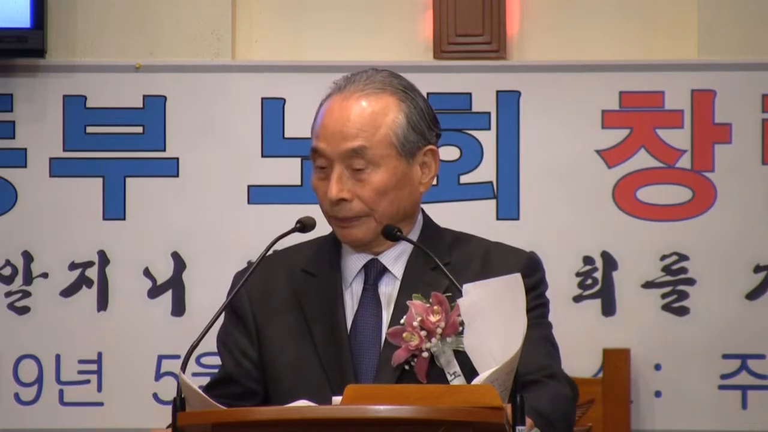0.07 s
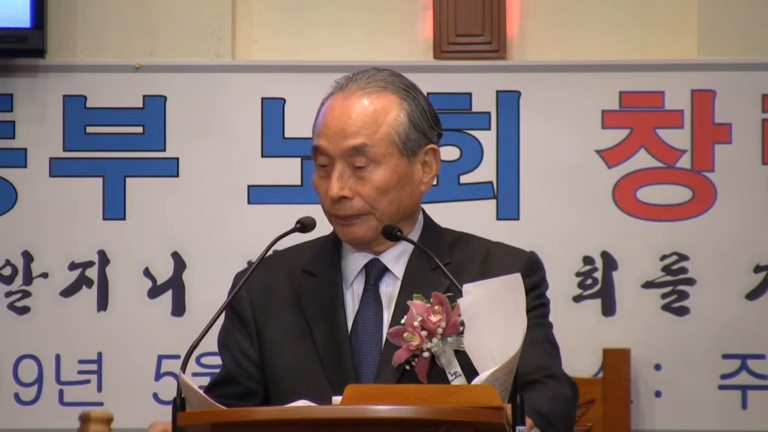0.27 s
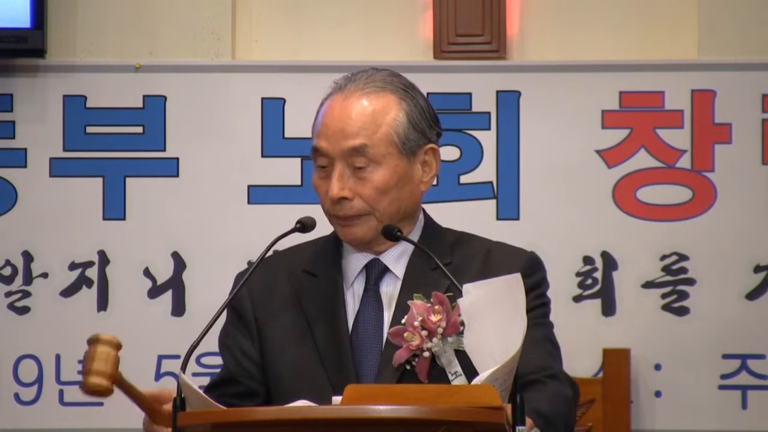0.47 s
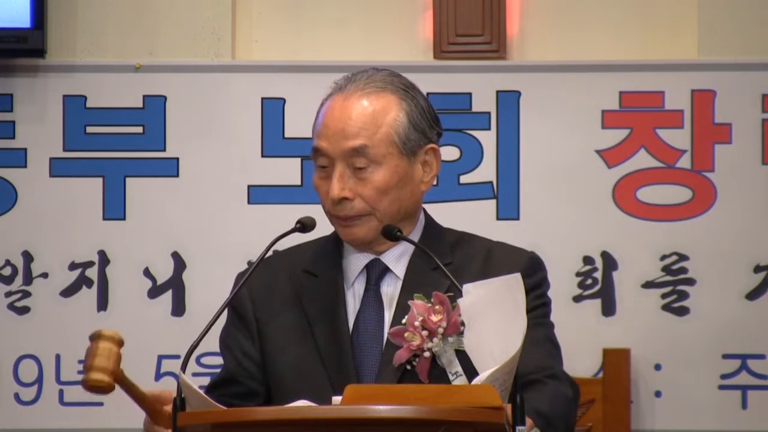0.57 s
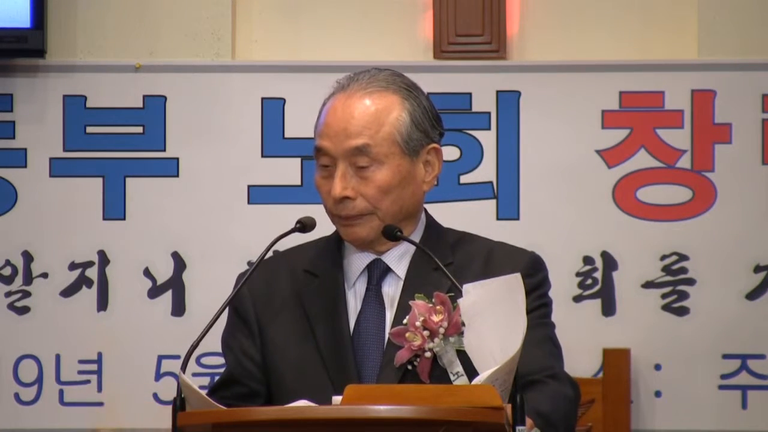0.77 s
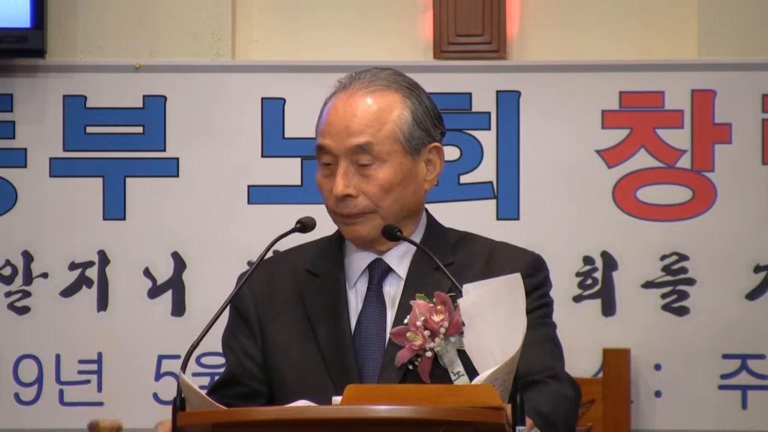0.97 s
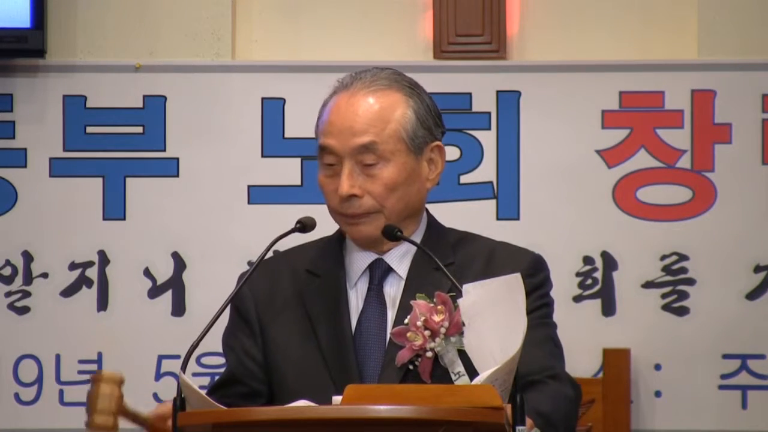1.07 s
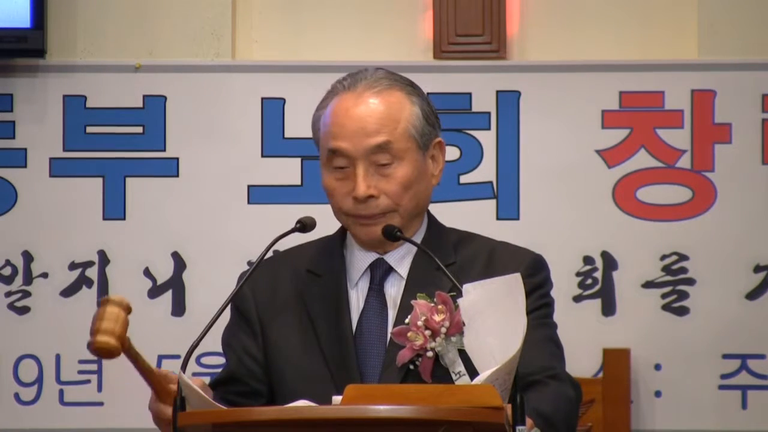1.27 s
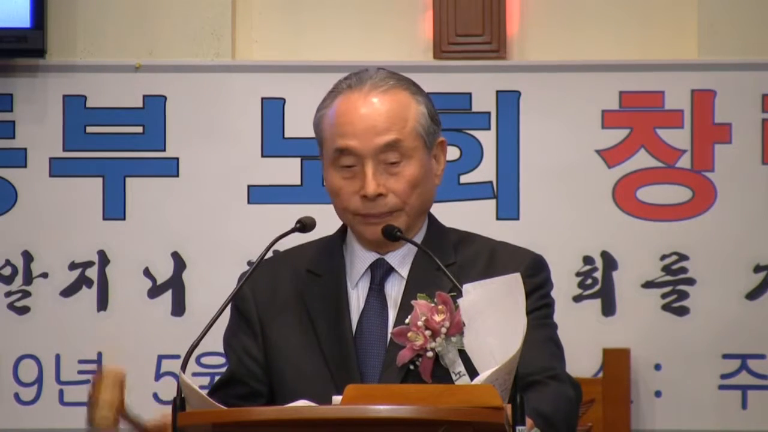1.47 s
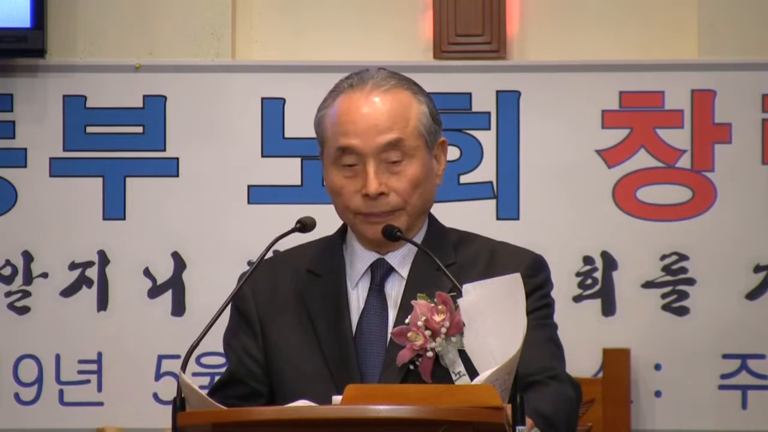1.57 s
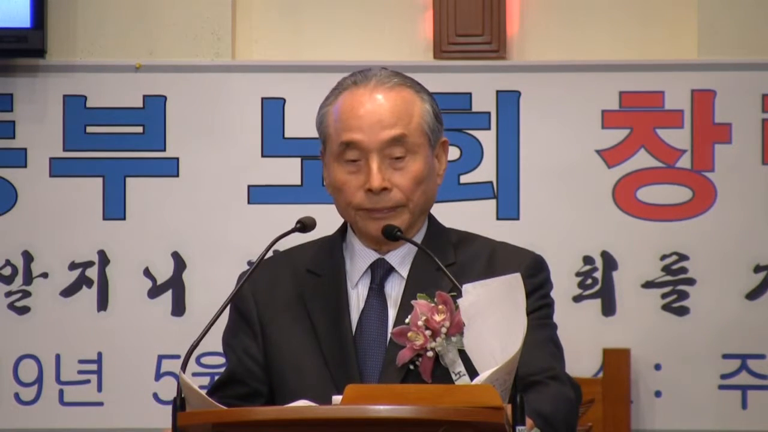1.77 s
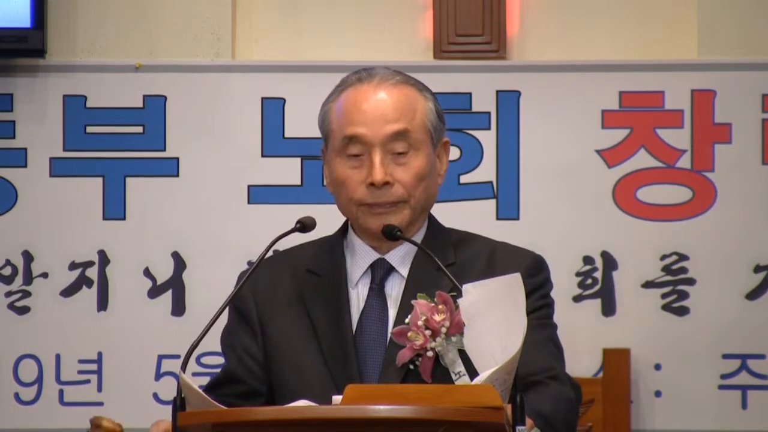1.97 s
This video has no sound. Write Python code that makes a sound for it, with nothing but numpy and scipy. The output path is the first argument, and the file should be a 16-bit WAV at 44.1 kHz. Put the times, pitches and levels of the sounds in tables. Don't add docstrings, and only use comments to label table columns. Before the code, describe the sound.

A wooden gavel hits its block on a hollow lectern at about 0.1, 0.9 and 1.6 seconds. Each blow is a sharp, bright wooden crack with a short knock and dull thump; the second is softer and woodier. Hall reverberation follows, the level ducking at each hit then swelling back. Steady low ventilation rumble lies underneath, with very faint seat rustles and bumps between blows.

```python
import sys
import numpy as np
from scipy import signal
from scipy.io import wavfile

SR = 44100
rng = np.random.default_rng(int(sys.argv[2]) if len(sys.argv) > 2 else 0)


def to_wav(s):
    ch = np.atleast_2d(s).T
    pcm = np.round(np.clip(ch, -1, 1) * 32767)
    wavfile.write(sys.argv[1], SR, pcm.astype(np.int16))


def how_loud(loudness_db):
    steps = np.asarray(loudness_db, float) / 20
    return 10 ** steps


N = 89655


def at_hz(points, hz):
    table = np.array(points, float)
    return [np.interp(np.log(hz), np.log(table[:, 0]), column) for column in table[:, 1:].T]


def band(x, low_hz, high_hz):
    sos = signal.butter(2, [low_hz, min(high_hz, 0.45 * SR)], "band", fs=SR, output="sos")
    return signal.sosfilt(sos, x)


def fold(x, response):
    return signal.fftconvolve(x, response, axes=-1)[..., :N]


def dying(t, t60_s):
    return (t >= 0) * how_loud(-60 * np.maximum(t, 0) / t60_s)


# frequency in Hz, likeness from 0 to 1.
LIKENESS = [(60, 0.9), (300, .96), (1500, 0.91), (4000, 0.79), (8000, 0.34), (14000, 0.1)]
# frequency in Hz, left over right in dB.
LEAN = [(60, -0.5), (240, -2.5), (950, -0.5), (3770, -1.0), (15000, -1)]


def stereo_bands(shape, size):
    settle = 4000
    edges_hz = 24 * 2 ** np.arange(0, 9.6, 1 / 3)
    white = rng.standard_normal((2, 2, size + settle))
    out = 0
    for k, (low_hz, high_hz) in enumerate(zip(edges_hz, edges_hz[1:])):
        mid, side = band(white[k % 2], low_hz, high_hz)[:, settle:]
        hz = np.sqrt(low_hz * high_hz)
        alike = np.clip(at_hz(LIKENESS, hz)[0], 0, 1)
        lean_db = at_hz(LEAN, hz)[0] / 2
        pair = np.sqrt(1 + alike) * mid + np.sqrt(1 - alike) * side * [[1], [-1]]
        out = out + shape(hz) * pair * how_loud(np.array([[lean_db], [-lean_db]]))
    return out


# frequency in Hz, density in dB per Hz.
AIR = [(15, -40), (25, -3), (190, 6.5), (384, -4.5), (476, -6.5), (641, -9.5), (1700, -18.5), (3080, -23),
       (16000, -35.5)]
# centre in Hz, width in Hz, level in dB.
DUCT = [(126.2, 4.7, -43), (168, 21, -43.5), (176, 6.7, -46)]


def air():
    air_db, patchy_db, knots = -39, 0.5, 24

    def shape(hz):
        drift = np.interp(np.linspace(0, knots - 1, N), np.arange(knots), rng.standard_normal(knots))
        return how_loud(at_hz(AIR, hz)[0] + patchy_db * drift)

    out = stereo_bands(shape, size=N)
    out = how_loud(air_db) * out / out.std()
    for hz, width_hz, db in DUCT:
        tone = band(rng.standard_normal(2 * N), hz - width_hz / 2, hz + width_hz / 2)[N:]
        out = out + how_loud(db) * tone / tone.std() * how_loud(np.array([[-1.1], [1.1]]))
    return out


# start in seconds, level in dB, low Hz, high Hz, t60 in seconds.
SHUFFLES = [
    (.59, -43, 290, 370, .25),
    (.705, -41, 300, 430, .18),
    (1.27, -49, 2600, 6500, .12),
    (1.36, -33, 90, 200, .4),
    (1.40, -60, 2000, 10000, .6),
    (1.504, -39, 350, 850, .12),
]


def shuffles():
    t, out = np.arange(N) / SR, 0
    for start_s, db, low_hz, high_hz, t60_s in SHUFFLES:
        noise = band(rng.standard_normal(N), low_hz, high_hz)
        onset = np.clip((t - start_s) / 0.005, 0, 1)
        out = out + how_loud(db) * noise / noise.std() * dying(t - start_s, t60_s) * onset
    return out


BLOW_S = [
    .1117,
    .8727,
    1.6331,
]
# length in seconds, level in dB, top in Hz.
LEAD_HISS = (.019, -35, 3300)


def lead_hiss():
    t, (length_s, db, top_hz) = np.arange(N) / SR, LEAD_HISS
    gate = sum(np.clip((t - s + length_s) / 0.0017, 0, 1) * (t < s) for s in BLOW_S)
    shared = rng.standard_normal(N)
    noise = band(0.9 * rng.standard_normal((2, N)) + shared, 330, top_hz)
    return how_loud(db) * gate * noise / noise.std()


# frequency in Hz, level in dB, t60 in seconds, build-up in seconds.
HALL = [(113, -26.5, 1.44, 0.1), (192, -17.5, 0.63, 0.04), (480, -20, 0.85, 0.018),
        (1440, -14.5, 0.64, 0.012), (3700, -25, 0.65, 0.0067), (6480, -29, 0.68, 0.005),
        (10770, -35, 0.41, 0.011), (16000, -60, 0.16, 0.01)]


def hall(x):
    t = np.arange(SR) / SR

    def shape(hz):
        db, t60_s, build_s = at_hz(HALL, hz)
        return how_loud(db) * (1 - np.exp(-(t / build_s) ** 2)) * dying(t, t60_s)

    return fold(x[None], stereo_bands(shape, size=len(t)))


# delay in seconds, level in dB, left over right in dB, left lag in seconds, top in Hz.
ECHOES = [
    (.0076, 1, 3, -.00002, 22000),
    (0.019, -8.5, 6, .00003, 8000),
    (0.021, -15, -15, -.00003, 1400),
    (.0022, -5, -1.5, .00002, 12000),
]


def early(x):
    out = np.array([x * how_loud(2.0), x * how_loud(7.5)])
    for delay_s, db, pan_db, lag_s, top_hz in ECHOES:
        dull = signal.lfilter(*signal.butter(1, top_hz, fs=SR), x)
        for side, sign in enumerate((0.5, -0.5)):
            delay = round((delay_s + sign * lag_s) * SR)
            out[side] += np.roll(dull, delay) * how_loud(5 + db + sign * pan_db)
    return out


# frequency in Hz, t60 in seconds,
# level in dB in blows 1, 2 and 3, extra dB toward the microphone.
WOOD = [(483.4, 0.026, -24, -13, -17, 0.5), (600, 0.026, -18.5, -6, -16, -3.5),
        (1299, 0.01, -24, -1, -13, 4), (1573, 0.022, -10.5, -3.5, -10, 2),
        (1758, 0.018, -12, -5.5, -12, -5), (2503, 0.025, -18, -12, -12, 9.5),
        (2724, 0.044, -42, -19, -19.5, 1.5), (3406, .03, -6, -14, -9, -2.5),
        (3760, 0.018, -13.5, -10, -12, -8.5), (4880, 0.021, -11.5, -15.5, -13.5, 1.5),
        (5860, .02, -14, -17, -15, -7), (6760, 0.031, -18.5, -16, -17.5, 1.5),
        (8250, 0.021, -14.5, -17.5, -27, 0), (9040, 0.015, -17, -20.5, -15, -1.5)]


def wood_modes(t, blow):
    swell_cycles = 2.3
    phases = rng.uniform(0, 2 * np.pi, len(WOOD))
    modes = []
    for row, phase in zip(WOOD, phases):
        hz, t60_s, db = row[0], row[1], row[2 + blow]
        envelope = dying(t, t60_s) * (1 - np.exp(-t * hz / swell_cycles))
        modes.append(how_loud(db) * envelope * np.sin(2 * np.pi * hz * t + phase))
    return modes


def crack(t):
    return band(rng.standard_normal(len(t)) * dying(t, 0.022), 1130, 7120)


def click(pulse):
    soft = 0.44
    return 10 * signal.lfilter([soft], [1, soft - 1], band(pulse, 260, SR / 2))


# low Hz, high Hz, level in dB.
LECTERN = [
    (118.7, 139.3, 5),
    (157, 231, 4.5),
    (294, 325, 0),
    (447, 655, -1.5),
]


def thump(pulse):
    return 20 * sum(how_loud(db) * band(pulse, low_hz, high_hz) for low_hz, high_hz, db in LECTERN)


# strength, crack, click, thump, hall send and recorder gain duck, all in dB.
BLOWS = [
    (2.9, -3, -2, -5, 0, 10.5),
    (-1.5, -2.5, -1, -1, -3.47, 8.5),
    (2.7, -1.5, 0, -5, 0.44, 13),
]


def gavel():
    swell_s = 0.00049
    near, far = np.zeros(N), np.zeros((2, N))
    t = np.arange(SR // 5) / SR
    pulse = 1.0 * (np.arange(len(t)) == 8)
    for k, (start_s, row) in enumerate(zip(BLOW_S, BLOWS)):
        db, crack_db, click_db, thump_db, send_db, _ = row
        modes = wood_modes(t, k)
        rings = sum(modes)
        facing = sum(how_loud(m[-1]) * ring for m, ring in zip(WOOD, modes))
        swell = how_loud(db) * (1 - np.exp(-t / swell_s))
        boom = how_loud(thump_db) * thump(pulse)
        start = int(start_s * SR)
        span = slice(start, start + len(t))
        near[span] += swell * (facing + how_loud(crack_db) * crack(t)) + 0.18 * boom
        far[:, span] += how_loud(send_db) * np.array([swell * rings, how_loud(click_db) * click(pulse) + boom])
    return near, far


def scene():
    drive_db = -0.68
    near, (head, lectern) = gavel()
    blows = early(near) + hall(head) + hall(lectern)
    return how_loud(drive_db) * blows + air() + shuffles() + lead_hiss()


def low_pass(x):
    return signal.sosfilt(signal.butter(12, 16250, fs=SR, output="sos"), x)


def record(dry):
    release_db_per_s, attack_s, clip, cutoff_hz = 76, 0.019, 1.3, 16000
    t, duck_db = np.arange(N) / SR, 0
    for start_s, row in zip(BLOW_S, BLOWS):
        since = np.maximum(t - start_s, 0)
        recovering_db = np.maximum(row[-1] - release_db_per_s * since, 0)
        duck_db = duck_db + (1 - np.exp(-since / attack_s)) * recovering_db
    held = dry * how_loud(-duck_db)
    overloaded = clip * np.tanh(held / clip)
    top_cut = signal.cheby2(12, 60, cutoff_hz, fs=SR, output="sos")
    mix = np.clip(signal.sosfilt(top_cut, overloaded), -1, 1)
    return low_pass(mix)


dry = scene()
out = record(dry)
to_wav(out)
```